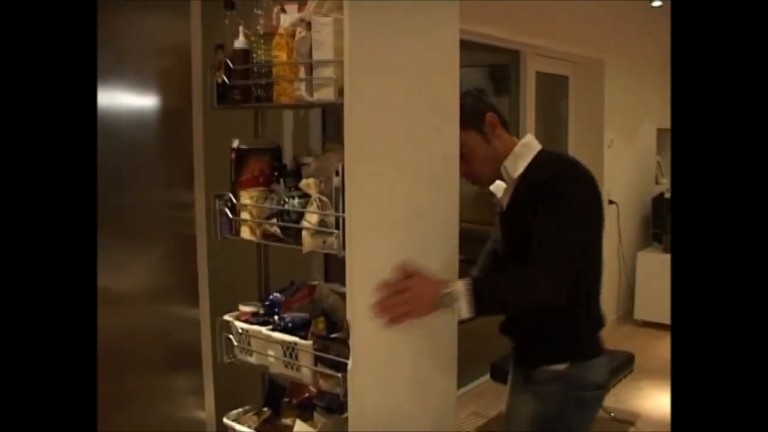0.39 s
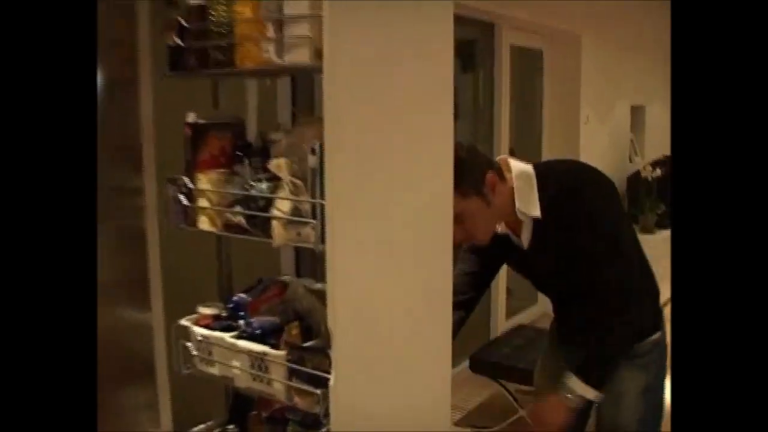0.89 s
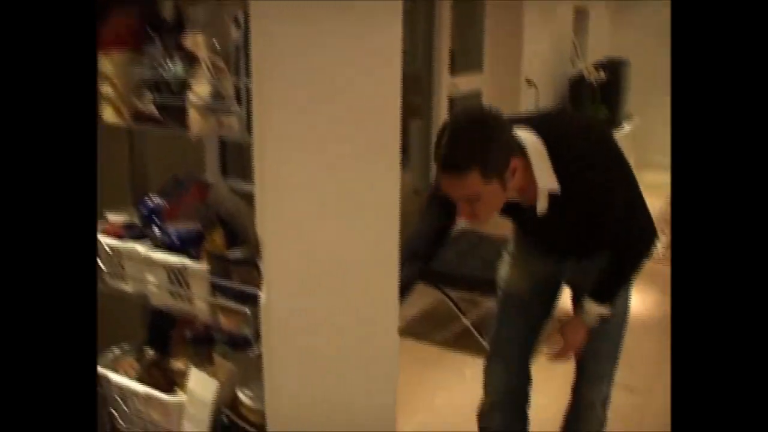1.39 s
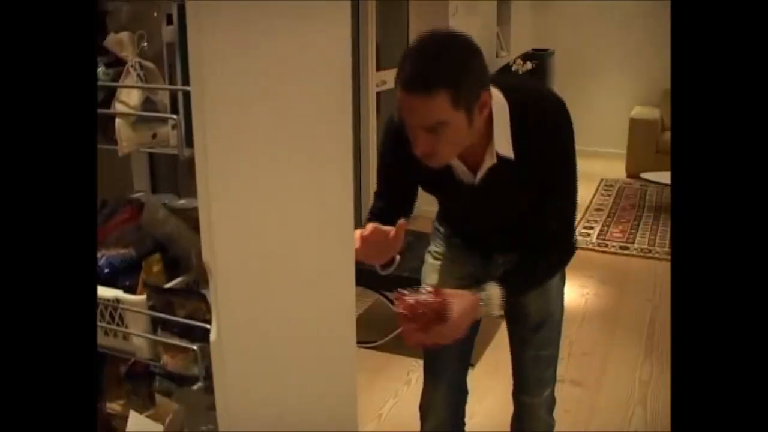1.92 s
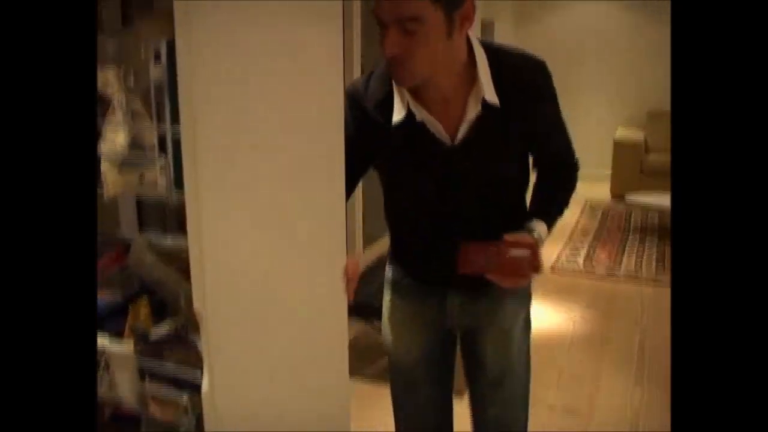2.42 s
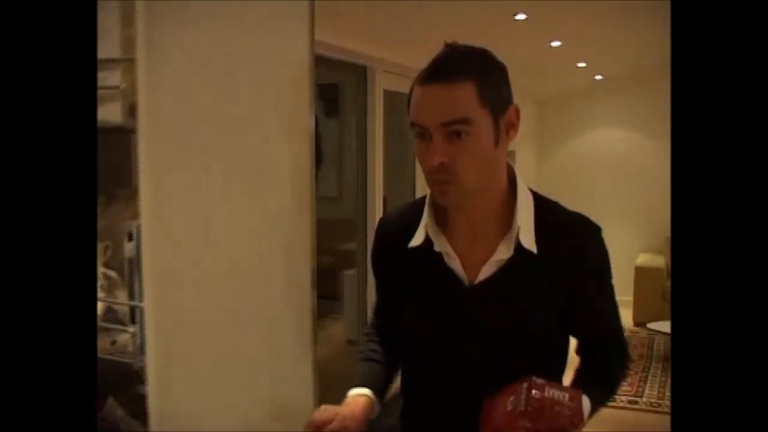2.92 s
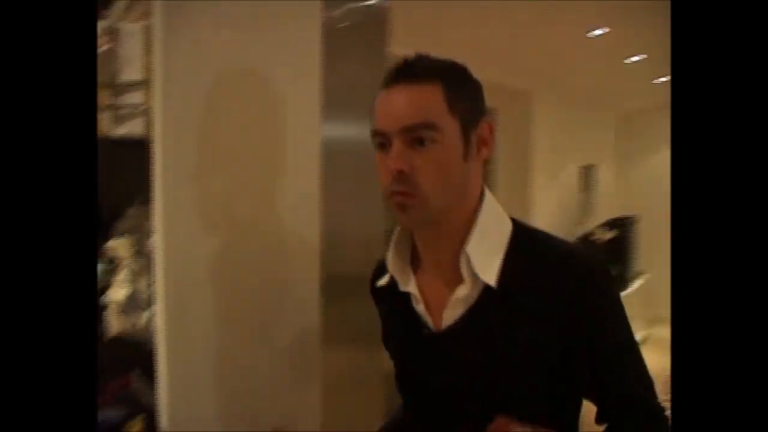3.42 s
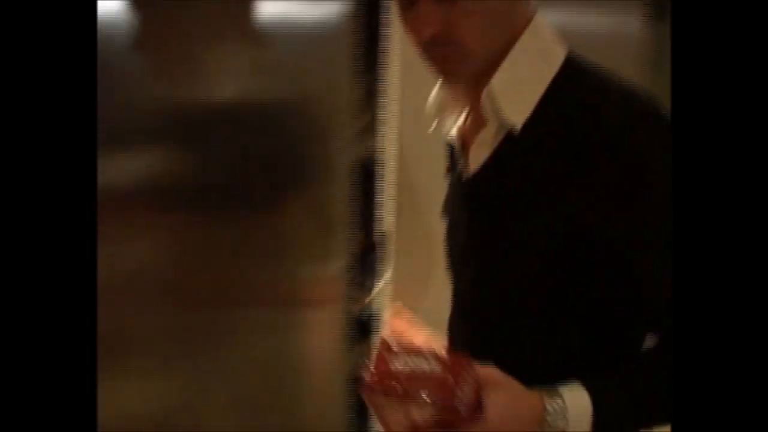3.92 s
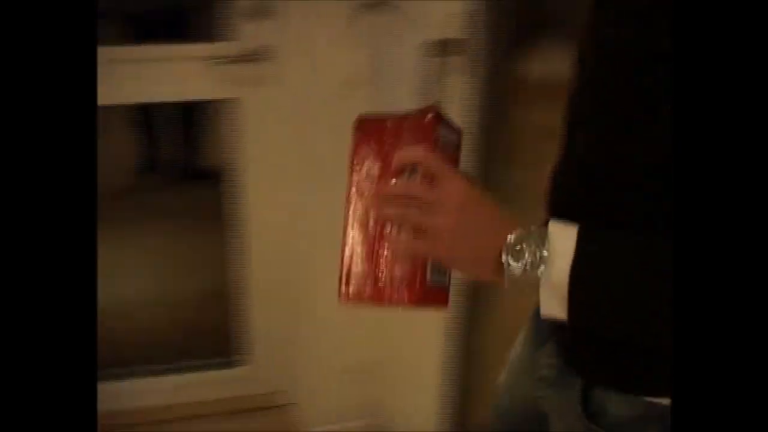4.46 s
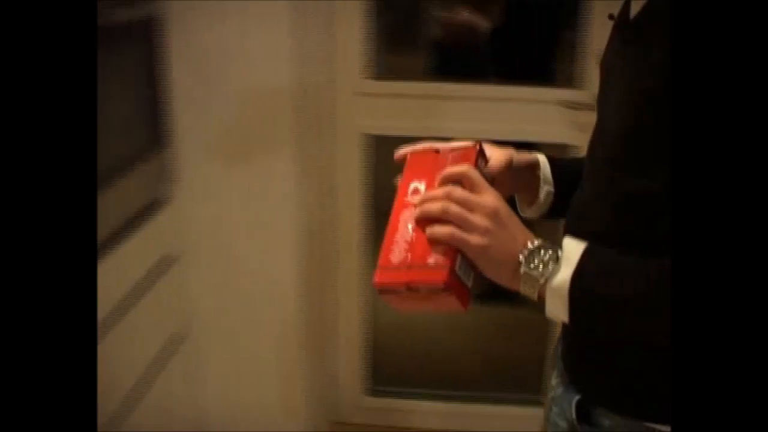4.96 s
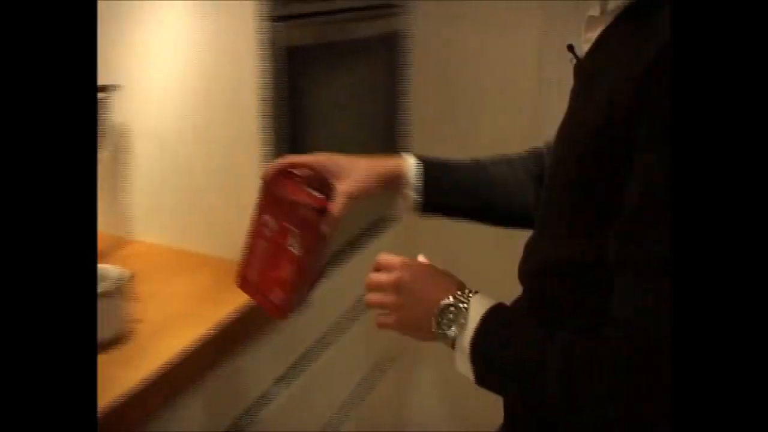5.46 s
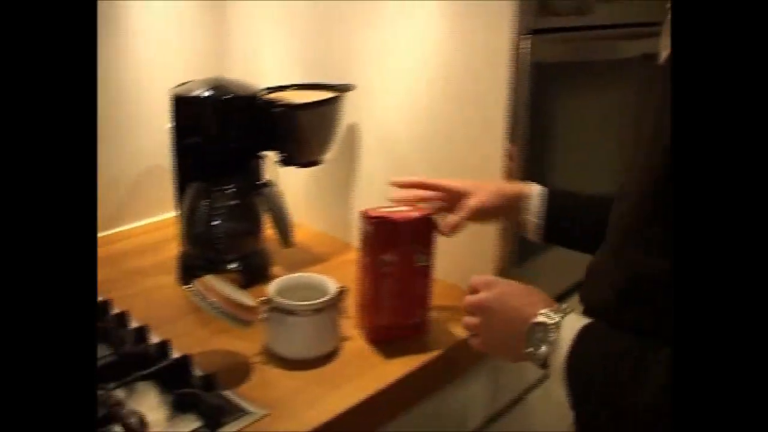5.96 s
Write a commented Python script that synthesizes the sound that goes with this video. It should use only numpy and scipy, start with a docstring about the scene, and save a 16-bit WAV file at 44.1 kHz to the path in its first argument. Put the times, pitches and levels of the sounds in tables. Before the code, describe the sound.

A hard, lively kitchen with soft low room tone and hiss. From 0 to 0.8 s a pull-out frame drags faintly to its stop, with a light scuff at the end. At about 0.9 to 1.0 s a foil packet is pulled from a wire basket: dull knocks and a cluster of crackles topped by a sharp bright snap. Smaller crinkles and basket knocks come near 1.4, 1.5 and 1.95 s. It quietens, with soft low steps, cloth rustle and a few ticks around 3.0 and 3.25 s. From 3.6 s the runners rumble and baskets jiggle, knocking up to 4.3 s. At 4.36 s the pantry slams: a loud, boomy, clustered bang, goods and baskets rattling away over half a second with room ring. A low step follows at 4.8 s, light foil ticks at 5.05 and 5.2 s, then at 5.7 s the packet thuds and rocks on the wooden worktop, crackling briefly.

```python
"""Slam of a pull-out pantry

In a hard-walled kitchen a foil packet is pulled from a basket and crackles, a tall pull-out pantry rolls in
on its runners and slams, and the packet is set down on a wooden worktop. Short pushes ring the cabinet and
the wood. Noise bursts make snaps, knocks and a few low footfall thumps; shaped noise makes scuffs, the
shaking frame, floor, cloth and hush."""
import sys
import numpy as np
from scipy import signal
from scipy.fft import rfft, irfft, next_fast_len
from scipy.io import wavfile
from scipy.ndimage import map_coordinates

SR = 44100
rng = np.random.default_rng(int(sys.argv[2]) if len(sys.argv) > 2 else 0)


def to_wav(sig):
    """Store sig (one row per channel, or 1-D mono) as 16-bit WAV at the path in sys.argv[1].

    Samples outside -1..1 are clipped; the rate is SR.
    """
    pcm = np.clip(np.atleast_2d(sig), -1, 1) * 32767
    pcm = np.round(pcm).astype(np.int16)
    wavfile.write(sys.argv[1], SR, pcm.T)  # frames by channels


def invert_db(level):
    """Linear amplitude ratio for a level in decibels (20 dB per decade), elementwise."""
    return 10 ** (np.asarray(level, dtype=float) / 20)


N = 268998  # length in samples


def unit(x):
    """Scale a sound to rms 1."""
    return x / np.sqrt(np.mean(x ** 2) + 1e-20)


def along(points, hz):
    """Read a curve of (pitch, value) points on a log pitch axis."""
    point_hz, value = np.transpose(points)
    return np.interp(np.log(hz + 1), np.log(point_hz + 1), value)


def level_curve(rows):
    """Join (time, level) points by straight lines, one level per sample."""
    time_s, level_db = np.transpose(rows)
    return np.interp(np.arange(N) / SR, time_s, level_db)


def wobble(rate):
    """A smooth random curve with rate new random values a second."""
    knots = rng.standard_normal(int(N * rate / SR) + 4)
    return map_coordinates(knots, [np.arange(N) * rate / SR])


def swell(start_s, level_db, rise_s, hold_s, t60_s):
    """A gain that rises at start_s, then falls 60 dB per t60_s once hold_s has passed since the start."""
    t = np.clip(np.arange(N) / SR - start_s, 0, None)
    fall = invert_db(level_db - 60 * np.clip(t - hold_s, 0, None) / t60_s)
    return fall * (1 - np.exp(-(t / rise_s) ** 2))


def filtered(x, response):
    """Multiply the spectrum of x by a response to frequency."""
    size = next_fast_len(len(x) + 8192)
    spectrum = rfft(x, size) * response(np.fft.rfftfreq(size, 1 / SR))
    return irfft(spectrum, size)[:len(x)]


def body(modes):
    """Response of an object that rings at several pitches, added with alternating sign."""
    def response(f):
        total = 0
        for k, (hz, width, db) in enumerate(modes):
            total = total + (-1) ** k * invert_db(db) * 1j * f * width / (hz * hz - f * f + 1j * f * width)
        return total
    return response


def noise(spectrum):
    """Random noise with a given tone colour, rms 1."""
    return unit(filtered(rng.standard_normal(N), lambda hz: invert_db(along(spectrum, hz))))


def shaken(modes, rate):
    """An object rung by noise that wavers in strength, rms 1."""
    push = rng.standard_normal(N) * invert_db(1.2 * wobble(rate))
    return unit(filtered(push, body(modes)))


def burst(t60_s, rise_s, response):
    """Dying noise sent through a response, peak 1, cut at 0.2 s."""
    t = np.arange(SR // 5) / SR
    push = rng.standard_normal(len(t)) * invert_db(-60 * t / t60_s) * (1 - np.exp(-t / rise_s))
    x = filtered(push, response)
    return x / np.abs(x).max()


def add(track, start_s, x):
    """Mix x into the track from start_s on."""
    part = track[round(start_s * SR):][:len(x)]
    part += x[:len(part)]


def add_in_room(track, start_s, x, room_db):
    """Mix in x and its own answer from the room."""
    add(track, start_s, x)
    add(track, start_s, invert_db(room_db) * kitchen(x))


# how long the room rings: pitch_hz [Hz], time to fall 60 dB t60_s [s]
KITCHEN_RING = [(60, 0.81), (170, 0.66), (500, 1), (2000, 1), (4000, 1), (8000, 0.68), (12000, 0.42)]


def kitchen(x):
    """The room's answer builds over a few ms, then each pitch dies at its own speed."""
    hz, t, z = signal.stft(rng.standard_normal(SR), SR, nperseg=256)
    fade = invert_db(-60 * t / along(KITCHEN_RING, hz)[:, None])
    tail = signal.istft(z * fade, SR, nperseg=256)[1]
    tail = tail * (1 - np.exp(-np.arange(len(tail)) / SR / .006))
    return signal.fftconvolve(x, tail / np.linalg.norm(tail))


def blows(contacts, modes, gain_db, room_db):
    """Half-sine pushes ring an object; a shorter contact sounds brighter."""
    out = np.zeros(N)
    for start_s, push_db, contact_s in contacts:
        push = np.sin(np.pi * np.linspace(0, 1, max(4, round(contact_s * SR))))
        push = invert_db(push_db + gain_db) * push / push.sum()
        x = filtered(np.pad(push, (0, SR // 2)), body(modes))
        add_in_room(out, start_s, x, room_db)
    return out


# the front meets the cabinet in several contacts:
# start_s [s], push_db [dB, before the gain in blows], contact_s [s]
SLAM_CONTACTS = [(4.3575, -20, 0.0012), (4.362, -12.5, .0012), (4.368, -3, 0.0022), (4.379, -14, 0.00088),
                 (4.388, -16, 0.0012), (4.391, -0.5, 0.0022), (4.403, -16, 0.0059), (4.453, -19.5, 0.0017)]
# ringing of the cabinet: pitch_hz [Hz], width_hz [Hz], level_db [dB, relative]
CABINET = [(46.7, 14, -2.5), (77.6, 36, 1), (178, 65, -1.5), (370, 20, 0.5), (473, 93, -4.5),
           (680, 26, -18), (800, 33, -11), (1000, 79, 0.5), (1270, 50, -13), (1600, 110, -16),
           (1830, 74, -18), (2400, 200, -23)]
# tone colour of the goods: pitch_hz [Hz], level_db [dB per Hz, relative]
GOODS = [(1470, -20), (2500, -10), (3180, -20.5), (4550, -13.5), (7830, -15), (8460, -15.5), (16000, -28.5)]
# tone colour of the baskets, also heard in jiggle(): pitch_hz [Hz], level_db [dB per Hz, relative]
BASKETS = [(180, -28), (300, -5.5), (473, -7), (600, -9.5), (714, -1.5), (787, -8.5), (1400, -13),
           (1810, -12), (4000, -33), (5200, -60), (8800, -120)]


def slam():
    """The cabinet booms while baskets and goods rattle on as fading, flickering noise, all with room."""
    landing_s, hold_s = 4.357, .038
    clatter = unit(noise(BASKETS) * invert_db(0.62 * wobble(250)))
    clatter = swell(landing_s, -26, .005, hold_s, t60_s=0.42) * clatter
    shake = unit(noise(GOODS) * invert_db(2.4 * wobble(300)))
    # the goods follow the baskets 4 ms later
    shake = swell(landing_s + .004, -34, .014, hold_s, t60_s=0.46) * shake
    room = kitchen(invert_db(-4.5) * clatter + invert_db(-5.5) * shake)[:N]
    return clatter + shake + room + blows(SLAM_CONTACTS, CABINET, gain_db=36.5, room_db=-4)


# the packet lands and rocks: start_s [s], push_db [dB, before the gain in blows], contact_s [s]
LANDINGS = [(5.7175, -20, 0.0016), (5.724, -22, 0.00081), (5.729, -20, 0.0014), (5.735, -24, 0.00162),
            (5.74, -22, 0.001), (5.746, -17, 0.0023), (5.760, -19, 0.00172), (5.771, -27, 0.0012),
            (5.786, -22.5, 0.0017), (5.826, -20, 0.006)]
# ringing of the wood: pitch_hz [Hz], width_hz [Hz], level_db [dB, relative]
WORKTOP = [(78, 27, -1.5), (152, 83, -2), (290, 97, -4), (445, 65, -5), (674, 104, -2), (880, 50, -7.5),
           (957, 43, -3.5), (1600, 260, -19), (1870, 180, -39), (2170, 690, -1)]


def set_down():
    """The brick-hard packet thuds on the worktop in a string of short contacts."""
    return blows(LANDINGS, WORKTOP, gain_db=40, room_db=-7.0)


# foil snaps and basket ticks, far ones with more room:
# start_s [s], peak_db [dB, without room], pitch_hz [Hz, favoured tone], room_db [dB, against the snap]
SNAPS = [(0.923, -29, 3740, -9.5), (0.938, -27.5, 3560, -19), (0.948, -38.5, 5960, -28),
         (0.96, -29.5, 7800, -8), (0.9654, -36, 4960, -24), (0.9734, -30, 3000, -19),
         (0.9768, -14, 3850, -21.5), (0.977, -7.5, 7250, -19), (0.9815, -29, 7200, -15),
         (1.0658, -31, 6900, -18), (1.376, -31, 3340, -10), (1.378, -34.5, 4970, -11),
         (1.4094, -47, 3030, -15), (1.49, -47, 5070, 7), (1.5677, -48, 4960, -16), (1.9453, -28, 5150, -19),
         (1.948, -37, 5600, -17), (1.9453, -37, 2220, -12), (1.9564, -40, 5500, -18),
         (2.9684, -58, 4320, -14), (2.993, -44, 3260, -6), (3.002, -52, 6000, -8), (3.011, -47, 2500, -14),
         (3.0959, -54.5, 2800, -9), (3.2317, -40.5, 2830, -4), (3.285, -47, 2780, -11),
         (3.472, -51, 2930, -0.5), (3.8422, -51.5, 5670, -19), (3.9036, -52, 3180, 2.5),
         (3.9325, -49, 2870, -3), (4.2272, -44.5, 4230, 0), (4.248, -51, 2850, -13), (5.052, -43, 6460, -7),
         (5.0623, -48, 7000, -4), (5.069, -45, 3900, -20), (5.1906, -36, 4850, -18.5),
         (5.1992, -39.5, 3360, -7), (5.684, -44, 4240, 8), (5.7146, -29.5, 7000, -9),
         (5.7444, -28, 8200, -9), (5.75, -30.5, 4960, -13)]
# ringing of the packet's wrapping, also heard in scuffs():
# pitch_hz [Hz], width_hz [Hz], level_db [dB, relative]
FOIL = [(1000, 210, -12), (2380, 600, -3.5), (3910, 940, -3), (5240, 1100, -3), (7000, 1440, -1.5),
        (11610, 4900, -12)]


def snaps():
    """Each crease or wire rings the wrapping and favours one pitch; harder snaps are shorter."""
    out, foil = np.zeros(N), body(FOIL)
    for start_s, peak_db, hz, room_db in SNAPS:
        crease = body([(hz, .5 * hz, 0)])
        # a snap of -38 dB fades over 116 cycles of its favoured pitch
        t60_s = 116 / hz * invert_db(-0.1278 * (peak_db + 38))
        x = invert_db(peak_db) * burst(t60_s, 0.00052, lambda f: foil(f) * (0.4 + crease(f)))
        add_in_room(out, start_s, x, room_db)
    return out


# fingers and goods drag over foil and wire:
# start_s [s], end_s [s], level_db [dB, before the foil's ringing], crackle [0 smooth to 1 grainy]
SCUFFS = [(0.63, 0.815, -51.5, 0.1), (0.923, 0.99, -33.5, .5), (1.378, 1.435, -46, .4),
          (1.49, 1.553, -50, 0.4), (1.935, 1.987, -42, 0.7), (2.965, 3.041, -56, 0.36),
          (3.235, 3.248, -41.5, 0.3), (3.91, 3.95, -61, 0.3), (4.0, 4.05, -59, 0.2),
          (4.228, 4.26, -61, 0.3), (5.047, 5.085, -60.5, 0.2), (5.203, 5.235, -66.5, 0.4),
          (5.672, 5.718, -56, 0.2), (5.728, 5.806, -48, 1)]


def scuffs():
    """Dense tiny creases: noise with a quick swell and slower fade, broken into grains, rings the foil."""
    envelope, t = np.zeros(N), np.arange(N) / SR
    grains = wobble(500)
    for start_s, end_s, level_db, crackle in SCUFFS:
        length_s = end_s - start_s
        times_s = [start_s, start_s + .15 * length_s, start_s + .6 * length_s, end_s]
        stroke = np.interp(t, times_s, [0, 1, .7, 0], left=0, right=0)
        envelope += invert_db(level_db + 7 * crackle * grains) * stroke
    dry = filtered(envelope * rng.standard_normal(N), body(FOIL))
    return dry + invert_db(-11.5) * kitchen(dry)[:N]


# knocks of baskets and jars, and a few low footfall thumps:
# start_s [s], peak_db [dB, without room], pitch_hz [Hz], width_hz [Hz], t60_s [s, fade of the driving noise]
KNOCKS = [(.885, -43, 604, 400, .25), (.919, -40.5, 545, 300, .1), (.929, -35.5, 1120, 400, 0.058),
          (.94, -30, 432, 253, 0.056), (.974, -29.5, 680, 610, 0.053), (.975, -46, 62, 30, 0.078),
          (1.24, -47, 374, 202, .078), (1.334, -38, 750, 400, 0.11), (1.375, -34.5, 1000, 400, .08),
          (1.50, -39, 500, 400, 0.23), (1.511, -46, 1300, 900, .12), (1.522, -31.5, 770, 300, 0.077),
          (1.932, -45.5, 90, 30, 0.11), (1.943, -37, 500, 40, 0.014), (2.299, -43.5, 206, 101, 0.18),
          (2.297, -46, 834, 300, 0.071), (2.398, -51, 308, 151, 0.067), (2.669, -55, 184, 80, .19),
          (2.735, -44.5, 147, 60, 0.21), (2.964, -46, 540, 400, 0.25), (3.01, -46, 90, 40, 0.076),
          (3.232, -45, 2000, 900, .038), (3.245, -41.5, 293, 200, 0.17), (3.282, -41, 300, 250, 0.081),
          (3.281, -35, 990, 348, 0.083), (3.283, -43.5, 2400, 1000, 0.039), (3.75, -54, 920, 400, .05),
          (3.848, -39, 890, 600, 0.064), (3.905, -42, 1310, 890, 0.079), (3.93, -33, 216, 50.5, 0.086),
          (3.934, -38, 1170, 800, 0.054), (4.008, -36, 200, 50, 0.069), (4.015, -45, 1250, 300, 0.077),
          (4.251, -33.5, 290, 220, 0.082), (4.254, -40.5, 1010, 504, 0.036), (4.278, -36, 247, 248, 0.57),
          (4.779, -43.5, 86, 30, 0.12), (5.052, -49.5, 1500, 1200, 0.075), (5.16, -47.5, 614, 300, 0.03),
          (5.193, -48, 1200, 1000, 0.1), (5.351, -53, 110, 50, 0.12), (5.398, -49.5, 370, 102, 0.055),
          (5.681, -46.5, 1250, 500, 0.17), (5.714, -36.5, 2300, 300, 0.065)]


def knocks():
    """Dull damped rings with a soft skirt of upper tones, fainter the purer the ring; long ones start softly."""
    out = np.zeros(N)
    for start_s, peak_db, hz, width, t60_s in KNOCKS:
        skirt_db = -8 + 10 * np.log10(width / hz)
        ring = body([(hz, width, 0), (0.99 * hz, 1.8 * hz, skirt_db)])
        x = burst(t60_s, 0.021 * t60_s, lambda f: ring(f) / (1 + 1j * f / (4 * hz)) ** 2)
        add_in_room(out, start_s, invert_db(peak_db) * x, room_db=-9.5)
    return out


# how hard the frame shakes as it is handled and rolled, also used in jiggle() and floor():
# time_s [s], level_db [dB]
FRAME_SHAKE = [(0, -60), (.65, -63.5), (1.07, -55), (1.17, -62.5), (1.5, -53), (1.7, -61), (2.1, -70),
               (2.36, -61.5), (2.51, -63), (3.02, -54), (3.29, -57.5), (3.61, -53.5), (3.92, -50.5),
               (4.34, -50.5), (4.4, -67), (4.9, -56.5), (5.14, -64), (5.4, -68), (5.68, -69)]
# ringing of the frame on its runners: pitch_hz [Hz], width_hz [Hz], level_db [dB, relative]
RUNNERS = [(131.3, 43.5, -1), (220, 45, 3), (400, 110, -4), (540.5, 99, -4.5), (936, 130, -9),
           (1250, 160, -13.5), (1587, 340, -18.5), (2296, 780, -22)]


def runners():
    """Uneven noise rings the frame on its runners, shaking as it is handled and rolled."""
    return invert_db(level_curve(FRAME_SHAKE)) * shaken(RUNNERS, 40)


def jiggle():
    """The baskets jiggle as flickering noise while the frame shakes."""
    flicker = unit(noise(BASKETS) * invert_db(6 * wobble(90)))
    return invert_db(level_curve(FRAME_SHAKE) - 12.5) * flicker


# ringing of the dragging frame: pitch_hz [Hz], width_hz [Hz], level_db [dB, relative]
SLIDE = [(560, 53, 7), (705, 134, 4.5), (1290, 190, -0.5), (1927, 240, -7), (4500, 560, -11),
         (8740, 295, -16.5)]


def drag():
    """The frame drags to its outer stop: wavering noise rings it, sags slowly, then fades fast."""
    t = np.arange(N) / SR
    stop_s, fade_s = 0.788, 0.063  # after the stop it loses 20 dB more per fade_s
    level_db = -58.5 - 5.5 * t - 20 * np.clip(t - stop_s, 0, None) / fade_s
    return invert_db(level_db + 3.2 * wobble(4.15)) * shaken(SLIDE, 27.2)


# weight shifts from foot to foot: start_s [s], level_db [dB, before the swell's shape]
STEPS = [(.27, -69), (.96, -72), (1.13, -62), (1.3, -61), (1.66, -60), (2.33, -65), (2.64, -64), (3.0, -62),
         (3.25, -56), (3.55, -65), (3.75, -56), (3.88, -50), (4.24, -49), (4.77, -42), (5.36, -57.5)]
# ringing of the floor boards: pitch_hz [Hz], width_hz [Hz], level_db [dB, relative]
FLOOR = [(55, 60, -9.5), (90, 25, 2.5)]


def floor():
    """Noise rings the boards, swelling at each step and following the frame's shaking."""
    tread = invert_db(level_curve(FRAME_SHAKE) - 17)
    for start_s, level_db in STEPS:
        tread = tread + swell(start_s, level_db, rise_s=0.015, hold_s=0.015, t60_s=.5)
    return tread * shaken(FLOOR, 4.1)


# how briskly sleeves and packet move: time_s [s], level_db [dB]
STIR = [(0, -72), (.14, -63), (.31, -64.5), (.65, -63), (1.07, -57.5), (1.17, -63), (1.33, -60), (1.9, -65),
        (2.1, -71), (2.55, -65), (2.88, -66.5), (3.02, -59.5), (3.17, -66), (4.06, -62.5), (4.27, -71),
        (5.14, -66), (5.39, -69.5), (5.68, -68.5)]
# tone colour of cloth and foil: pitch_hz [Hz], level_db [dB per Hz, relative]
RUSTLE = [(710, -37), (1200, -10.5), (1400, -3), (1630, -6.5), (2510, -6.5), (3150, -8), (8170, -10),
          (10600, -15), (16000, -21)]


def rustle():
    """Cloth and foil rustle as flickering noise that follows the movement."""
    return invert_db(level_curve(STIR)) * unit(noise(RUSTLE) * invert_db(1.66 * wobble(60)))


# tone colour of room air and microphone hiss: pitch_hz [Hz], level_db [dB per Hz, relative]
HUSH = [(20, -25), (35, -2), (55, 0), (124, -9), (210, -15.5), (280, -17), (500, -15.5), (700, -14.5),
        (1400, -28.5), (3000, -32.5), (6400, -25.5), (11000, -35), (15200, -33), (16500, -47)]


def hush():
    """Room air and microphone hiss are steady noise at -66 dB."""
    return invert_db(-66) * noise(HUSH)


def scene():
    """All sources added at one microphone."""
    events = slam() + set_down() + snaps() + scuffs() + knocks()
    background = runners() + jiggle() + drag() + floor() + rustle() + hush()
    return (events + background)[None]


def top_cut(x):
    """Nothing passes above the cut-off."""
    return signal.sosfilt(signal.butter(12, 16640, fs=SR, output="sos"), x)


def record(dry):
    """The microphone rolls off the deepest bass, below about 33 Hz."""
    x = filtered(dry[0], lambda hz: (1j * hz) ** 2 / (33 ** 2 - hz ** 2 + 1.4j * 33 * hz))
    return top_cut(x[None])


dry = scene()
out = record(dry)
to_wav(out)
```